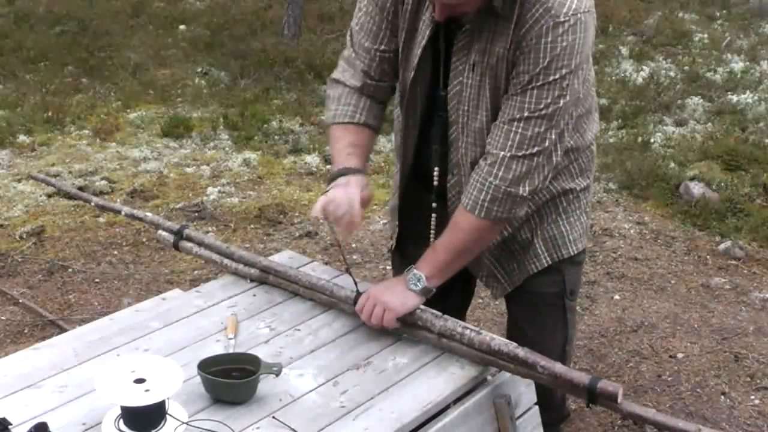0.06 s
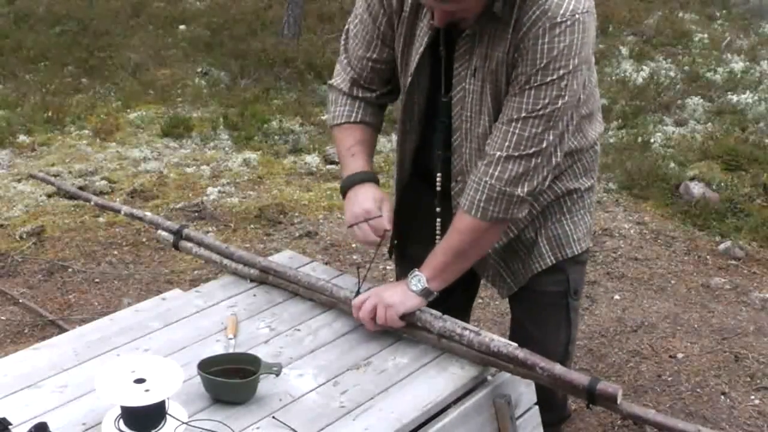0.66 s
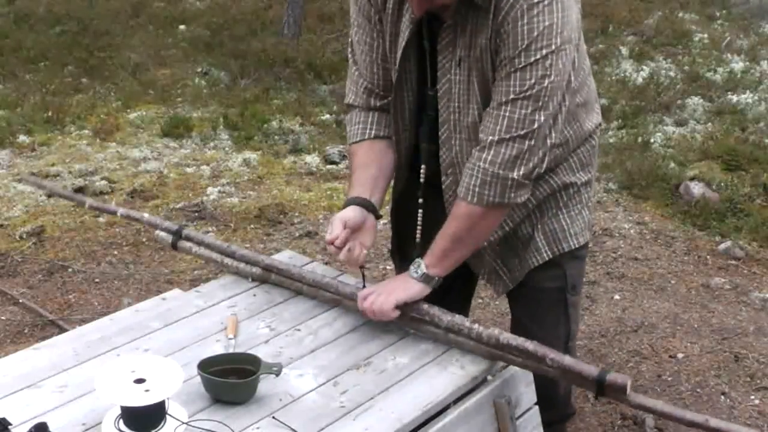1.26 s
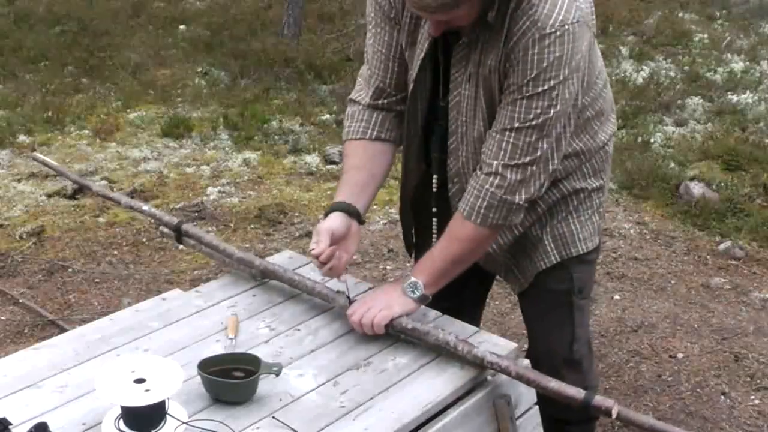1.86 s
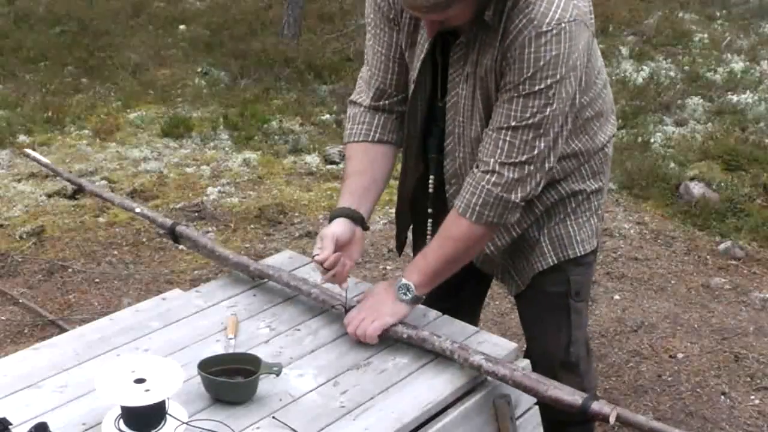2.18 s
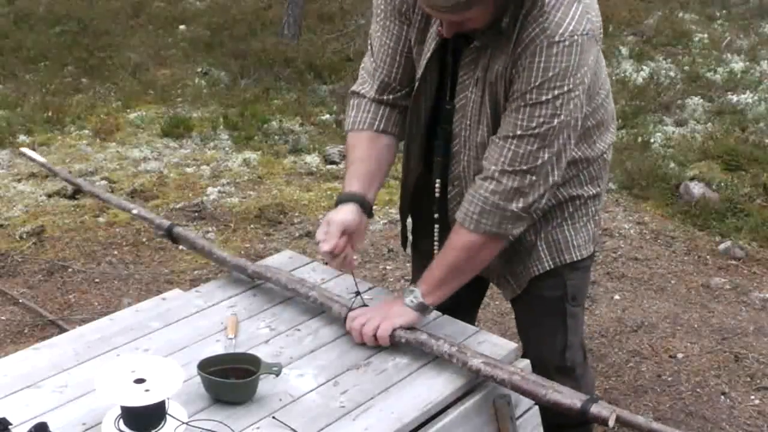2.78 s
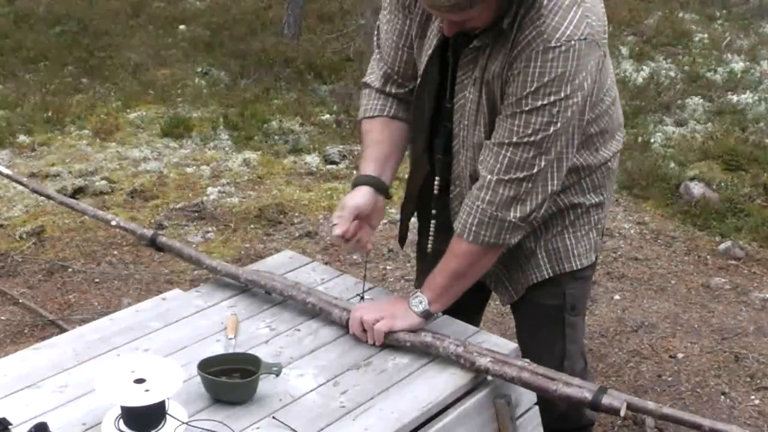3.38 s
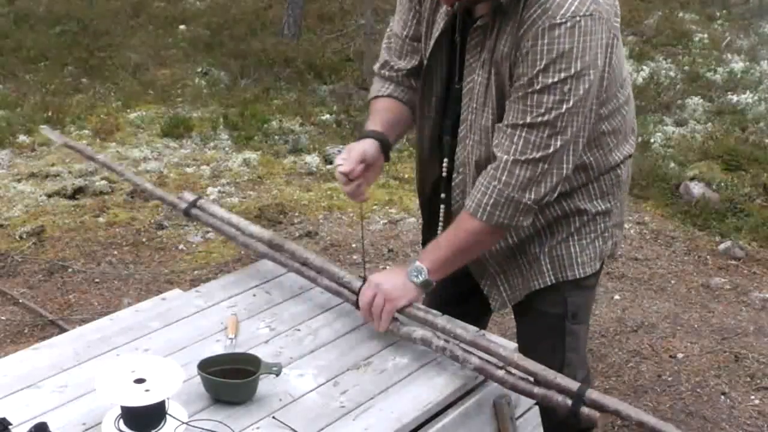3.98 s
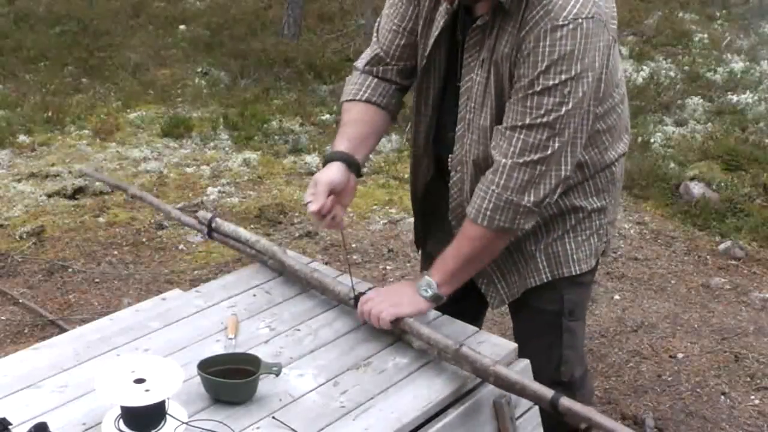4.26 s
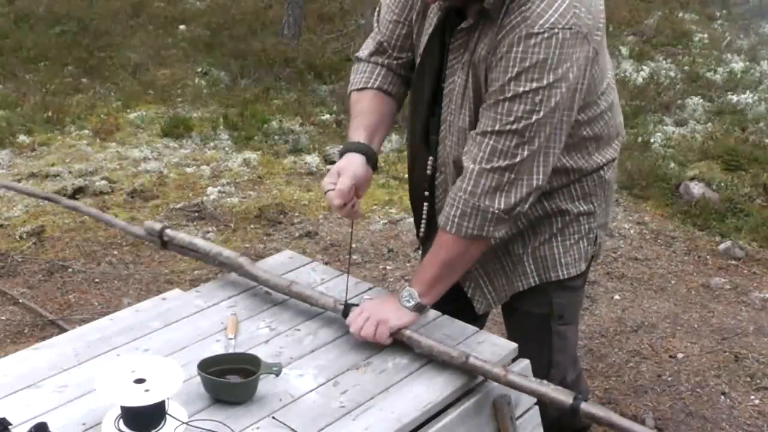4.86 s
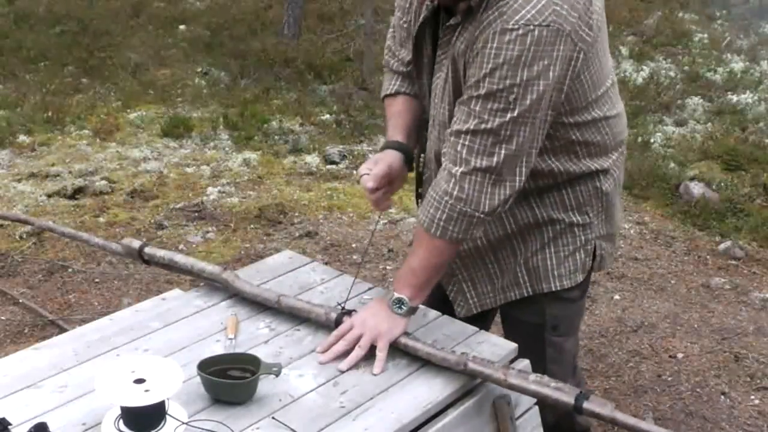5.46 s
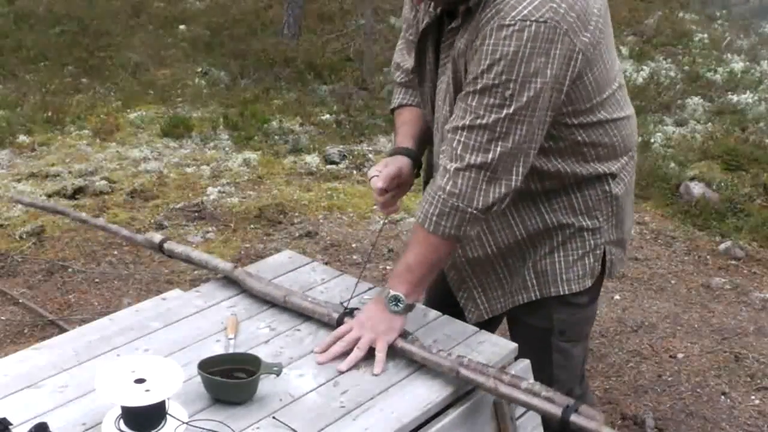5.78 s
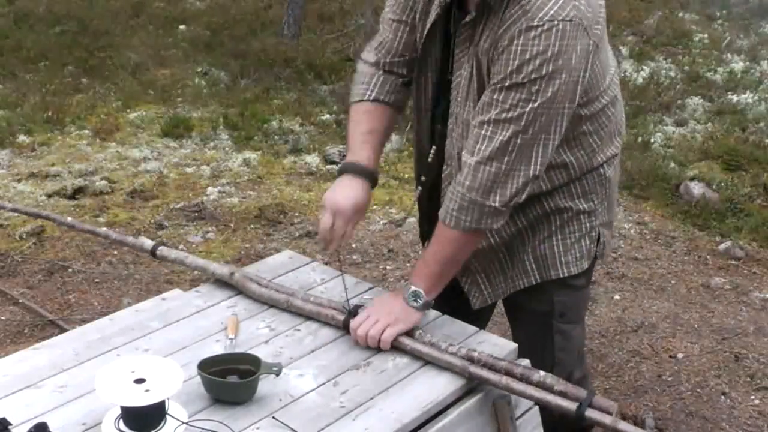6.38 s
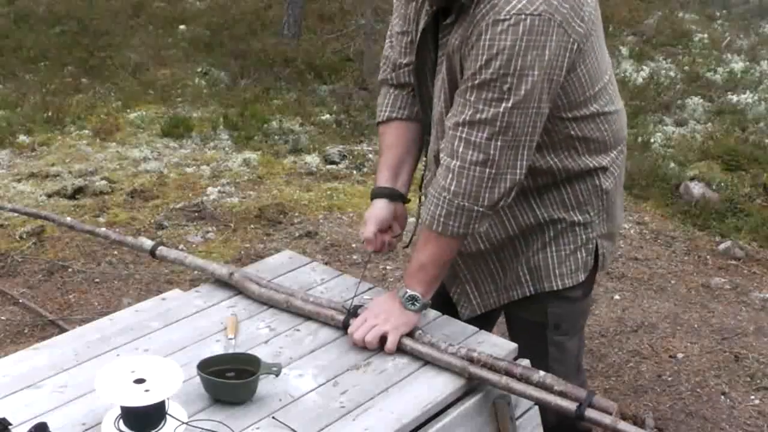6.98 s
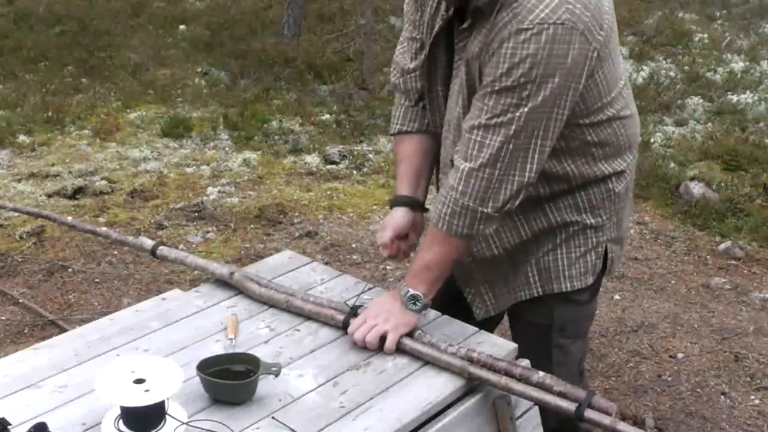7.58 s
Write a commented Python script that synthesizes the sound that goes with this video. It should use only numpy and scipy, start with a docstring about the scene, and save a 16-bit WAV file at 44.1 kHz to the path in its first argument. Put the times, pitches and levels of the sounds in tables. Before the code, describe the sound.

Cord hisses through a knot in uneven pulls while wooden poles creak, rub and knock on a plank table, over faint outdoor air.

```python
"""Outdoors among trees, microphone two metres from a plank table where two saplings are being lashed.
A metal watch strap ticks, then the cord hisses through the knot in pulls and bites the bark in slips
that ring the poles. A hand rubs over them; at 1.3 s they rock and knock on the boards. Slips squeak
around 3.5 s, more knocks come in clusters from 4.2 s, and near 7 s the lashing seats with a crack.
Soft forest hiss and light wind on the microphone lie behind it throughout."""
import sys
import numpy as np
from scipy import signal
from scipy.fft import rfft, irfft, next_fast_len
from scipy.io import wavfile
from scipy.ndimage import uniform_filter1d

SR = 44100
rng = np.random.default_rng(int(sys.argv[2]) if len(sys.argv) > 2 else 0)


def wav_out(sig):
    """Save sig, one row per channel (or a flat mono array), as 16-bit PCM at SR to the path in sys.argv[1]."""
    wavfile.write(sys.argv[1], SR, np.round(np.clip(np.atleast_2d(sig).T, -1, 1) * 32767).astype(np.int16))


N = 336689

# modes of the plank table and of the two hand-damped poles: f/Hz, level/dB, t60/s
BOARD_MODES = [(60, -16, .15), (80.6, 7, 0.35), (129.8, -2, 0.5), (163, 1.5, 0.26), (183, 2.5, 0.03),
               (195.5, 2.5, 0.14), (233.4, -3.5, 0.26), (271.5, 3, 0.076), (320, -13, 0.033),
               (330, -14.5, 0.12), (387.7, -3.5, 0.19), (462.8, -1.5, 0.19), (524, 6, 0.084),
               (575.5, -3.5, 0.13), (674.7, 8, 0.095), (741, -0.5, 0.19), (840, -19.5, 0.15)]
POLE_MODES = [(834, 9.5, 0.017), (906, -13, 0.074), (974, 1, 0.11), (1116, 5, 0.027), (1180, 0.5, 0.084),
              (1221, -0.5, 0.044), (1392, 5.5, 0.024), (1536, 3, 0.038), (1666, -2.5, 0.1),
              (1777, 6, 0.018), (1760, -22, 0.015), (1977, -5, 0.017), (2370, -27, .018), (2700, 1, 0.025)]
# contact spectra of a thud on the boards, a clack of the poles, a jolt into the table: f/Hz, level/dB
THUD_SPECTRUM = [(30, -78), (65, -8.5), (120, 6.5), (750, -5), (1400, -8.5), (2500, -29.5)]
CLACK_SPECTRUM = [(150, -11.5), (600, 9), (1950, 1), (2400, -7.5), (3500, -6), (8000, -11)]
JOLT_SPECTRUM = [(60, -19), (140, -1), (300, 3), (750, -4.5), (1400, -2.5), (2500, -24)]


def cord_speed():
    """Speed of the cord as a gain: each pull takes off, runs and stops over a slow creep."""
    # pulls through the knot: t/s at full speed, length/s, level/dB
    pulls = [(0.093, 0.19, -56.5), (0.45, 0.38, -54), (0.753, 0.21, -54), (0.97, 0.2, -52.5),
             (1.316, 0.13, -52), (1.439, 0.13, -49), (1.574, 0.14, -47), (1.687, 0.18, -51),
             (1.98, 0.1, -55.5), (2.234, 0.071, -53), (2.367, 0.14, -53.5), (2.474, 0.13, -49.5),
             (2.618, 0.11, -49), (2.754, 0.16, -48.5), (2.855, 0.043, -40), (3.02, 0.21, -48),
             (3.301, 0.097, -47), (3.63, 0.25, -48.5), (3.873, 0.12, -48), (3.987, 0.14, -43.5),
             (4.178, 0.1, -48), (4.294, 0.12, -48), (4.353, 0.12, -43.5), (4.468, 0.02, -51),
             (4.587, 0.052, -50), (4.802, 0.1, -42.5), (4.933, 0.062, -48.5), (5.027, 0.041, -45),
             (5.07, .05, -49.5), (5.362, 0.13, -51), (5.64, 0.048, -47.5), (5.747, 0.3, -51.5),
             (5.947, 0.13, -52.5), (6.077, 0.41, -48.5), (6.311, 0.13, -48.5), (6.44, 0.35, -55.5),
             (6.765, 0.06, -48.5), (7.336, .08, -58)]
    rise, fall, abruptness = .54, .42, 2.7  # rise and fall are shares of a pull's length
    t = np.arange(N) / SR
    power = undb(-57.5 + 1.5 * wander(rate=8.4)) ** 2  # creep
    for s, length, db in pulls:
        distance = np.abs(t - s) / (length * np.where(t < s, rise, fall))
        power += undb(db) ** 2 * np.exp(-2 * np.minimum(distance ** abruptness, 20))
    return np.sqrt(power)


def cord(speed):
    """The braid rasps through the knot in tiny jerks; fast pulls whistle and single fibres snap."""
    # spectra of the braid's hiss and whistle: f/Hz, level/dB
    hiss_spectrum = [(1500, 4.5), (2300, 0), (3200, -1.5), (4200, 3.5), (6200, 3), (7600, 2.5), (9600, 3),
                     (12000, -1), (14500, -3), (16000, -14)]
    whistle_spectrum = [(3500, -34), (4900, -14), (6100, -3), (7300, -17), (9800, -6.5), (12000, -21)]
    hiss = noise_pair(hiss_spectrum)
    whistle = noise_pair(whistle_spectrum) * speed / speed.max()
    fibres = unit(colour(grains(rate=300), hiss_spectrum))
    mid, side = hiss + undb(-1) * whistle
    rasp = undb(2 * wander(rate=900) - .3)
    flutter = undb(1.16 * wander(rate=100) + .51)
    return speed * flutter * rasp * widen(mid + undb(-9) * fibres, side, side_db=-7)


def slips():
    """The taut cord jerks over the bark; the poles ring and pass the jolt to the table."""
    # slips of the cord: t/s, length/s, pole level/dB, pole f/Hz, bark tick level/dB
    bites = [(0.254, 0.003, -41, 1650, -75), (0.391, 0.0028, -42, 1270, -63),
             (0.433, 0.0083, -44.5, 1500, -56), (0.488, 0.017, -43.5, 1410, -60),
             (0.506, 0.01, -35, 1320, -46.5), (0.863, 0.0017, -40.5, 1580, -48.5),
             (0.879, 0.0042, -37, 1260, -47), (1.162, 0.016, -46, 1350, -49.5),
             (1.527, 0.015, -36.5, 1270, -60), (1.756, 0.014, -43, 1240, -68),
             (1.7855, 0.00036, -31, 1450, -46), (1.7926, 0.0004, -30.5, 1510, -45.5),
             (1.7993, 0.00044, -37, 1550, -52), (1.803, 0.00034, -32.5, 1300, -62),
             (2.587, 0.0095, -36.5, 1380, -62), (2.751, 0.0029, -33.5, 1490, -51),
             (2.809, 0.0097, -31, 1300, -53), (2.849, 0.022, -31.5, 1340, -43),
             (3.011, 0.025, -32.5, 1300, -45), (3.224, 0.0011, -44, 1370, -73),
             (3.475, 0.0061, -33, 1440, -41.5), (3.524, 0.0063, -33, 1000, -40.5),
             (3.55, 0.0052, -40, 1500, -39.5), (3.582, 0.0049, -34, 990, -40),
             (3.6051, 0.0027, -29, 1560, -43.5), (3.612, 0.0034, -36, 1240, -55),
             (3.675, 0.0091, -32, 1380, -39.5), (3.69, 0.014, -34.5, 1050, -47),
             (3.96, 0.02, -30.5, 1390, -60), (3.974, 0.016, -29, 1430, -54),
             (4.226, 0.0031, -31.5, 1830, -43.5), (4.767, 0.011, -37, 1390, -61),
             (5.132, 0.0062, -41.5, 1340, -49.5), (5.47, .008, -40, 1250, -62),
             (5.4872, 0.00076, -36, 1950, -54), (5.49, .001, -37, 1300, -62),
             (5.494, 0.00087, -32.5, 710, -66), (5.514, 0.001, -30.5, 960, -59),
             (5.543, 0.00048, -28, 950, -62), (5.555, 0.006, -40, 1000, -65), (5.566, .006, -41, 1270, -64),
             (5.704, 0.0051, -40.5, 1240, -46.5), (5.723, 0.019, -38.5, 1240, -48),
             (5.778, 0.002, -32.5, 980, -57), (5.822, 0.0046, -42, 1430, -47.5),
             (5.996, 0.0045, -42.5, 1490, -50), (6.319, 0.011, -41, 1930, -47),
             (6.34, 0.0013, -40, 1450, -61), (6.365, .012, -42, 1300, -53),
             (6.629, 0.0053, -38.5, 1180, -55), (6.665, 0.0062, -37.5, 1200, -50.5),
             (6.675, 0.0048, -34.5, 1130, -55), (6.693, 0.0011, -38.5, 1370, -63),
             (6.718, .001, -43, 1400, -62), (6.74, 0.014, -35, 1360, -52), (6.758, .004, -33, 1390, -52),
             (6.884, 0.0042, -42.5, 1320, -66), (7.025, 0.0093, -33, 1250, -63),
             (7.314, 0.0011, -46, 1610, -54), (7.331, 0.005, -31, 1390, -47.5),
             (7.4344, 0.0044, -29, 1090, -60), (7.456, .002, -41, 1300, -58),
             (7.535, 0.0065, -35.5, 1110, -80)]
    out = np.zeros(N)
    for s, length, poles_db, poles_hz, tick_db in bites:
        boards_db = poles_db - 1.5 - 10 * np.log2(poles_hz / 1315)  # a duller slip passes on more
        force = stick_slip(length, rate=2500, catch=.7)
        clack = ring(POLE_MODES, poles_hz, octaves=.55, detune=.01)
        clack = dry_wood(clack, poles_hz, octaves=.49, t60=.027, db=2)
        thud = ring(BOARD_MODES, 495, octaves=.7, detune=.04)
        thud = dry_wood(thud, 529, octaves=.56, t60=.046, db=-1)
        add(out, s, strike(clack, force, CLACK_SPECTRUM, poles_db))
        add(out, s, strike(thud, force, JOLT_SPECTRUM, boards_db))
        add(out, s, burst(tick(length, decay=.0012, centre_hz=5350), tick_db))
    return out


def knocks():
    """The poles drop on the boards, with one clean thump or a brief chatter."""
    # landings on the table: t/s, chatter/s, board level/dB, board f/Hz, pole level/dB
    landings = [(0.885, .004, -34, 400, -57), (1.327, .001, -22, 150, -40.5), (1.341, .001, -23, 150, -47),
                (1.369, 0.0037, -20, 228, -37), (1.383, .003, -26, 450, -40),
                (1.391, 0.0052, -26, 380, -50), (1.415, 0.0028, -36, 330, -46),
                (1.492, 0.0034, -31.5, 229, -41), (2.874, 0.0041, -31, 214, -44),
                (2.887, 0.0033, -37, 190, -51), (2.991, 0.0041, -29.5, 268, -44),
                (3.281, 0.0099, -34, 442, -38.5), (3.319, 0.0095, -30.5, 394, -41.5),
                (3.341, 0.0078, -33.5, 236, -58), (3.961, 0.0042, -36, 261, -57),
                (3.982, 0.011, -27.5, 250, -53), (4.226, 0.0031, -19, 350, -27),
                (4.229, 0.0028, -20.5, 332, -40), (4.243, 0.0041, -25.5, 290, -59),
                (4.268, 0.0044, -30.5, 250, -51), (4.369, .003, -20.5, 380, -29),
                (4.387, 0.0024, -22, 233, -38), (4.398, 0.007, -23.5, 610, -44),
                (4.411, .002, -28, 400, -36), (4.419, 0.0016, -25.5, 305, -40),
                (4.451, 0.011, -27.5, 300, -46), (4.477, 0.00085, -26.5, 219, -63),
                (4.511, .003, -34.5, 128, -62), (4.635, 0.0068, -40, 153.5, -61),
                (5.3013, .002, -21, 204, -41), (5.332, 0.004, -26.5, 243, -33.5),
                (5.344, 0.011, -21, 288, -42), (5.362, 0.0085, -22.5, 235, -38),
                (5.626, 0.004, -25.5, 260, -37), (5.686, 0.0061, -30.5, 197, -57),
                (5.885, 0.0084, -38, 330, -61), (5.905, 0.0064, -24.5, 515, -27),
                (5.911, 0.004, -27.5, 333, -46), (6.137, 0.0047, -27, 324, -50),
                (6.153, .009, -29, 324, -48), (7.226, 0.012, -34.5, 323, -49),
                (7.299, .009, -31.5, 278, -40), (7.376, .009, -35, 314, -54)]
    out = np.zeros(N)
    for s, chatter, boards_db, boards_hz, poles_db in landings:
        force = stick_slip(chatter, rate=1200, catch=.6)
        thud = ring(BOARD_MODES, boards_hz, octaves=1.1, detune=.02)
        clack = ring(POLE_MODES, 1050, octaves=.7, detune=.02)
        thud = dry_wood(thud, boards_hz, octaves=1, t60=.11, db=-2)
        clack = dry_wood(clack, 1170, octaves=.66, t60=.034, db=-2)
        add(out, s, strike(thud, force, THUD_SPECTRUM, boards_db))
        add(out, s, strike(clack, force, CLACK_SPECTRUM, poles_db))
        add(out, s, burst(tick(.0038, decay=.0077, centre_hz=5340), boards_db - 38.5))
    return out


def squeaks():
    """The catches of a slip feed a single resonance: the poles squeak or the boards groan."""
    # slips that lock on one mode: t/s, length/s, f/Hz, level/dB, t60/s
    locked_slips = [(0.884, 0.0043, 524, -32.5, .09), (1.784, 0.0032, 1300, -30, 0.071),
                    (1.7986, 0.0033, 1250, -26.5, 0.036), (3.477, 0.0044, 1746, -31.5, 0.041),
                    (3.485, 0.01, 940, -33.5, 0.066), (3.526, 0.004, 1800, -35, 0.029),
                    (3.535, 0.008, 960, -35, .05), (3.555, 0.012, 983, -30.5, 0.055),
                    (3.58, 0.0038, 1770, -33, 0.037), (3.586, 0.012, 970, -36, 0.073),
                    (3.61, 0.01, 986, -30, 0.07), (3.638, 0.052, 1004, -32.5, 0.041),
                    (3.64, .03, 520, -36, 0.051), (3.974, 0.0062, 1520, -34, .04),
                    (3.976, 0.009, 553, -31, 0.046), (4.225, 0.0013, 131, -27, .3),
                    (4.37, .015, 165, -23, 0.095), (4.396, 0.0091, 518, -21, 0.094),
                    (4.433, 0.04, 690, -32, 0.069), (5.906, 0.003, 690, -27, 0.077),
                    (5.907, 0.0049, 199.6, -22.5, 0.1)]
    out, t = np.zeros(N), np.arange(SR // 3) / SR
    for s, length, hz, db, t60 in locked_slips:
        force = stick_slip(length, rate=2200, catch=1)
        add(out, s, burst(signal.fftconvolve(ping(t, hz, t60), force), db))
    return out


def crack(s, gap_s, wood_db):
    """The lashing seats itself: one pole snaps hard against the other, twice, the second time lower."""
    # the two contacts: f/Hz, level/dB, t60/s
    contacts = [(1450, -31.5, 0.018), (1100, -32, 0.018)]
    # spectrum of pole snapping against pole: f/Hz, level/dB
    crack_spectrum = [(300, -29), (900, -5), (1350, 4), (1850, 6.5), (2300, -10), (2800, -3), (3300, -21),
                      (4800, -22), (5500, -8), (6600, -11), (7500, -28), (15000, -36)]
    out, t = np.zeros(N), np.arange(4096) / SR
    for start, (hz, db, t60) in zip((s, s + gap_s), contacts):
        splinters = rng.standard_normal(len(t)) * np.exp(-t / .0011)
        add(out, start, burst(ping(t, hz, t60), db))
        add(out, start, burst(colour(splinters, crack_spectrum), db + 3.5))
    force = stick_slip(.005, rate=2500, catch=.7)
    clack = ring(POLE_MODES, 1200, octaves=.62, detune=.012)
    clack = dry_wood(clack, 1180, octaves=.64, t60=.066, db=5)
    thud = ring(BOARD_MODES, 400, octaves=.86, detune=.023)
    add(out, s + gap_s, strike(clack, force, CLACK_SPECTRUM, wood_db))
    add(out, s + gap_s, strike(thud, force, JOLT_SPECTRUM, wood_db))
    return out


def shifting():
    """Friction on boards and poles as two gains: brisk shifts that sag and stop, over a restless grip."""
    # poles and hand shifting on the table: t/s, length/s, board level/dB, pole level/dB
    shifts = [(0.742, 0.3, -49.5, -52.5), (0.965, 0.041, -65, -47.5), (1.269, .06, -50, -50),
              (1.337, 0.11, -32, -43), (1.489, 0.18, -41.5, -45), (2.305, 0.049, -55, -48),
              (2.873, 0.066, -43, -45.5), (2.95, 0.08, -40, -42.5), (3.01, 0.1, -38.5, -44),
              (3.336, 0.19, -65, -66), (3.429, 0.034, -43, -50), (3.491, 0.19, -36, -47),
              (3.61, 0.12, -35.5, -45), (3.757, 0.13, -44, -47.5), (3.924, 0.06, -41, -40.5),
              (4.267, 0.094, -48, -42), (4.38, 0.093, -32, -54), (4.565, 0.023, -62, -45),
              (4.947, 0.16, -44.5, -46.5), (5.194, 0.96, -46, -56), (5.358, 0.15, -44, -51),
              (5.506, 0.066, -33, -41), (5.63, 0.2, -37.5, -45.5), (5.872, 0.02, -39, -62),
              (5.94, 0.18, -41.5, -41), (6.186, 0.13, -42, -52), (6.33, 0.16, -44, -50.5),
              (6.626, 0.16, -43.5, -47), (7.244, 0.26, -42.5, -61), (7.298, 0.076, -54, -48),
              (7.596, 0.036, -45, -53)]
    attack_s, release_s, sag_db = .017, .037, -5
    grip_db = np.array([[-61], [-63]]) + 6 * wander(rate=11)
    boards, poles = undb(grip_db) ** 2
    for s, length, boards_db, poles_db in shifts:
        t = np.arange(int((length + release_s) * SR)) / SR
        gate = np.clip(np.minimum(t / attack_s, 1 - (t - length) / release_s), 0, 1)
        speed = gate * undb(sag_db * t / length)
        add(boards, s, (speed * undb(boards_db)) ** 2)
        add(poles, s, (speed * undb(poles_db)) ** 2)
    return np.sqrt(boards), np.sqrt(poles)


def rubbing(speed):
    """Small juddering catches of cord and hand sound the poles and boards and crumble the bark."""
    # spectrum of crumbling bark: f/Hz, level/dB
    grit_spectrum = [(1200, -18), (2400, -12), (3200, -11.5), (4400, -2.5), (6000, -3.5), (10000, -12.5)]
    board_friction, pole_friction = shifting()
    pole_catches = grains(rate=1800, spread_db=.5) * undb(3.2 * wander(rate=150))
    clack = ring(POLE_MODES, 1900, octaves=.84, detune=.0097)
    clack = dry_wood(clack, 1276, octaves=.67, t60=.02, db=0)
    board_catches = grains(rate=900)
    thud = ring(BOARD_MODES, 340, octaves=.76, detune=.00086)
    thud = dry_wood(thud, 420, octaves=.86, t60=.067, db=-3.5)
    poles = unit(colour(signal.fftconvolve(pole_catches, clack)[:N], CLACK_SPECTRUM))
    boards = unit(colour(signal.fftconvolve(board_catches, thud)[:N], THUD_SPECTRUM))
    grit = undb(-10) * unit(colour(pole_catches, grit_spectrum))
    scrape = np.hypot(pole_friction, undb(-9) * speed)  # the running cord scrapes the poles too
    return (poles + grit) * scrape + boards * board_friction


def flicks():
    """The cord jumps off a snag in the bark with one bright click, a little different on each side."""
    # snags: t/s, level/dB, f/Hz, left minus right/dB
    snags = [(1.3237, -45, 8000, 2), (1.566, -47, 9100, 2), (1.5845, -41, 9200, 4), (2.8282, -45, 9500, 14),
             (2.8638, -30, 9600, 3), (3.4204, -48.5, 12000, -1.5), (5.196, -49, 11000, -2),
             (5.3606, -50, 10000, 1), (5.385, -43.5, 10000, 1), (5.6211, -44.5, 10500, 14)]
    out = np.zeros((2, N))
    for s, db, centre_hz, pan_db in snags:
        mid, side = (tick(.001, decay=.0007, centre_hz=centre_hz) for _ in range(2))
        left, right = widen(mid, side, side_db=-9)
        add(out[0], s, burst(left, db + pan_db / 2))
        add(out[1], s, burst(right, db - pan_db / 2))
    return out


def watch_strap():
    """A metal strap gives a few tiny dry ticks with a trace of ring."""
    # ticks of the strap: t/s, relative level/dB
    clinks = [(0.1453, -44), (0.148, -40), (.154, -51)]
    out = np.zeros(N)
    tone = ping(np.arange(2048) / SR, hz=11130, t60=.009)
    for s, db in clinks:
        add(out, s, burst(tone, db - 3))
        add(out, s, burst(tick(.0015, decay=.0011, centre_hz=15000), db - 8))
    return out


def stick_slip(length, rate, catch, size=2048):
    """Force of one slip: a first release, then uneven catches that fade; a long slip starts gently."""
    t = np.arange(size) / SR
    fade = np.sqrt(np.clip(1 - t / (1.3 * length + 1 / SR), 0, 1))
    force = catch * (rng.random(size) < rate / SR) * rng.uniform(-1.07, 1, size) * fade
    force[0] = 1 / (1 + length * rate / 20)
    return force


def ring(modes, centre_hz, octaves, detune, size=16384):
    """Ring of wood: a contact favours modes near one pitch and varies their weight, phase and tuning."""
    hz, db, t60 = np.transpose(modes)
    t = np.arange(size) / SR
    weight, phase, tuning = rng.standard_normal((3, len(hz)))
    gain = undb(db) * np.exp(-.5 * (np.log2(hz / centre_hz) / octaves) ** 2)
    contact = undb(2.5 * weight) * np.exp(.8j * phase)
    exponents = 2j * np.pi * hz * (1 + detune * tuning) - np.log(1000) / t60
    return ((gain * contact) @ np.exp(np.outer(exponents, t))).imag


def dry_wood(wood, centre_hz, octaves, t60, db, size=4096):
    """Add to a ring the crowd of close, quickly damped modes that makes wood sound dry."""
    t, steps = np.arange(size) / SR, np.arange(-6, 7) / 2
    band_db = np.maximum(-10 / np.log(10) * (steps / octaves) ** 2, -60)
    band = np.transpose([centre_hz * 2 ** steps, band_db])
    crowd = rng.standard_normal(size) * die_away(t, t60)
    crowd[0] = .5 * np.sqrt(np.sum(crowd ** 2))  # the modes start in step, with one strong swing
    return burst(wood, 0) + np.pad(burst(colour(crowd, band), db), (0, len(wood) - size))


def strike(wood, force, spectrum, db):
    """Drive a ring with a force, through the softness of the contact."""
    return burst(colour(signal.fftconvolve(wood, force), spectrum), db)


def tick(length, decay, centre_hz, size=4096):
    """Bark fibres snapping: crackle that builds as the slip gathers speed and dies as it ends."""
    # spectrum of the crackle: f/Hz, level/dB
    tick_spectrum = [(1500, -32), (2700, 12), (3300, 5.5), (4200, 9.5), (6200, 3.5), (7600, 5),
                     (10000, 7.5), (12500, -3), (16000, 1.5)]
    t = np.arange(size) / SR
    crackle = rng.standard_normal(size) * undb(2.5 * rng.standard_normal(size))
    build = 1 - np.exp(-t / (length / 2 + 1 / SR))
    fade = np.exp(-t / (length + decay) - np.maximum(t - length, 0) / decay)
    focused = [(hz, db - 4 * np.log2(hz / centre_hz) ** 2) for hz, db in tick_spectrum]
    return colour(crackle * build * fade, focused)


def outdoors(x, pan_db, scatter_db, t60, size=12000):
    """Direct sound at the microphone, and faint scatter from table, ground and trees."""
    t = np.arange(size) / SR
    echoes = rng.standard_normal((2, size)) * die_away(t, t60) * (t > .001)
    echoes /= np.sqrt(np.sum(echoes ** 2, axis=1, keepdims=True))
    bright = colour(x, [(150, .74), (500, 3.6), (1500, 10), (4000, 23.5), (9000, 22.4)])
    scattered = signal.fftconvolve(bright[None], echoes, axes=1)[:, :N]
    return pan(x, pan_db) + undb(scatter_db) * scattered


def forest():
    """Even, wide hiss of the open air."""
    # spectrum of the forest air: f/Hz, level/dB
    air_spectrum = [(35, -42), (60, 1.5), (98, -4), (124, -4.5), (207, -8), (363, -9), (398, -0.5),
                    (469, -8), (607, -8), (682, -7.5), (1740, -13), (3340, -26.5), (7400, -17.5),
                    (14900, -22.5), (16000, -26)]
    mid, side = noise_pair([(20, -24), *air_spectrum])
    return undb(-55 + .5 * wander(rate=2.63)) * widen(mid, side, side_db=4)


def wind(left_db, right_db):
    """Light air buffets each microphone port on its own."""
    # strength of the breeze: t/s, level/dB
    breeze = [(0.0, -48.5), (0.83, -53.5), (1.24, -55), (1.5, -53.5), (2.6, -55.5), (2.92, -49),
              (3.65, -50.5), (4.06, -48.5), (5.0, -61), (5.36, -49), (6.65, -56), (7.62, -57.5)]
    # spectrum of the buffeting: f/Hz, level/dB
    eddy_spectrum = [(10, 8), (28, 8), (50, 3.5), (80, -16), (160, -19), (400, -52)]
    eddies = noise_pair(eddy_spectrum)
    strength = undb(np.interp(np.arange(N) / SR, *np.transpose(breeze)))
    gusts = undb(2.5 * wander(rate=11))
    return eddies * strength * gusts * undb([[left_db], [right_db]])


def undb(db):
    """Decibels to gain."""
    return 10 ** (np.asarray(db) / 20)


def unit(x):
    """Scale to rms 1."""
    return x / np.sqrt(np.mean(x ** 2))


def burst(x, db):
    """Scale a short sound to the energy of 10 ms at the given level."""
    return x * undb(db) / np.sqrt(np.sum(x ** 2) / (SR / 100))


def add(track, s, x):
    """Mix a short sound into a track at s seconds."""
    start = max(int(s * SR), 0)
    track[start:start + len(x)] += x[:max(N - start, 0)]


def die_away(t, t60):
    """Gain that falls 60 dB in t60 seconds."""
    return np.exp(-np.log(1000) * t / t60)


def ping(t, hz, t60):
    """One damped resonance."""
    return np.sin(2 * np.pi * hz * t) * die_away(t, t60)


def colour(x, points):
    """Causal filter through (f/Hz, level/dB) points, built from the cepstrum of its log gain."""
    hz, db = np.transpose(points)
    size = 2 * next_fast_len(x.shape[-1] // 2 + 2048)
    bins = np.maximum(np.fft.rfftfreq(size, 1 / SR), 1)
    cepstrum = irfft(np.log(undb(np.interp(np.log(bins), np.log(hz), db))))
    cepstrum[1:size // 2] *= 2
    cepstrum[size // 2 + 1:] = 0
    return irfft(rfft(x, size) * np.exp(rfft(cepstrum)))[..., :x.shape[-1]]


def noise_pair(spectrum):
    """Two independent noises of one spectrum, at rms 1."""
    return unit(colour(rng.standard_normal((2, N)), spectrum))


def wander(rate):
    """Random drift with a spread near 1 that turns rate times a second."""
    hold = max(int(SR / rate), 1)
    steps = np.repeat(rng.standard_normal(N)[:N // hold + 1], hold)
    return uniform_filter1d(steps, hold)[:N]


def grains(rate, spread_db=0):
    """Tiny catches of fibre on bark: random clicks of uneven size, about rate a second."""
    clicks = (rng.random(N) < rate / SR) * rng.standard_normal(N)
    return clicks * undb(spread_db * np.minimum(rng.exponential(size=N), 4))


def widen(mid, side, side_db):
    """Mid and side to left and right."""
    return mid + undb(side_db) * side * np.array([[1], [-1]])


def pan(x, db):
    """Place a sound by its level difference, left minus right."""
    return x * undb(np.array([[db], [-db]]) / 2)


def scene():
    """Wood a little left of the microphone, cord a little right, open air all round."""
    speed = cord_speed()
    wood = knocks() + slips() + squeaks() + rubbing(speed)
    strap = watch_strap()
    snap = crack(s=6.9354, gap_s=.0022, wood_db=-29.5)
    air = forest() + wind(left_db=4.5, right_db=-3)
    braid = pan(cord(speed) + flicks(), db=-1.5)
    handling = outdoors(wood + strap, pan_db=1.3, scatter_db=-23, t60=.091)
    seating = outdoors(snap, pan_db=4, scatter_db=-25, t60=.036)
    return braid + handling + seating + air


def record(dry):
    """The microphone chain cuts off steeply above 15.9 kHz."""
    return signal.sosfilt(signal.ellip(10, .2, 80, 15900, fs=SR, output="sos"), dry)


dry = scene()
out = record(dry)
wav_out(out)
```